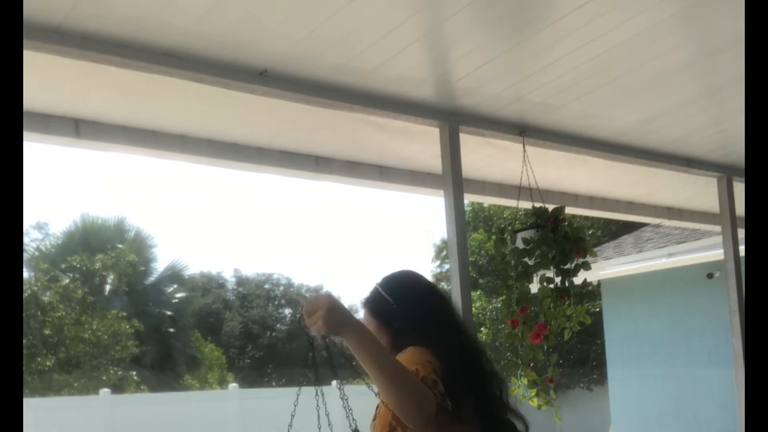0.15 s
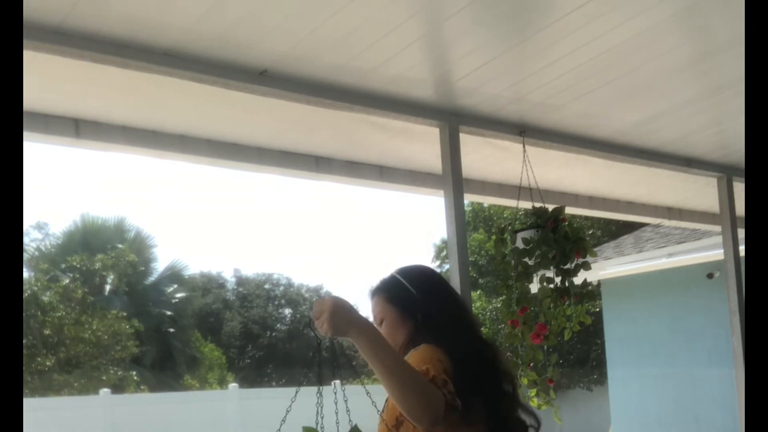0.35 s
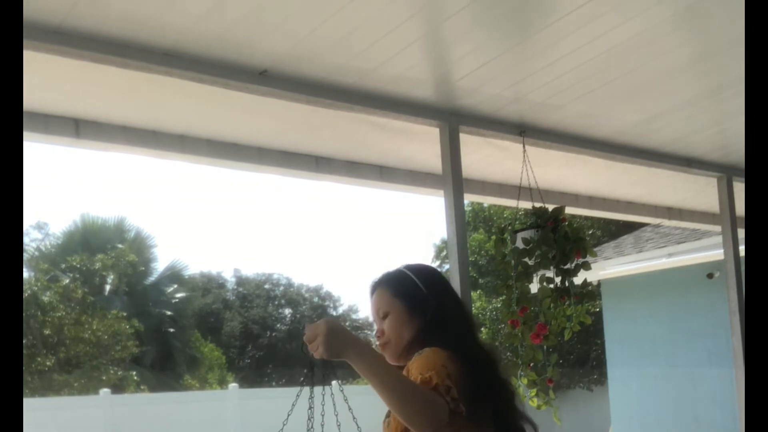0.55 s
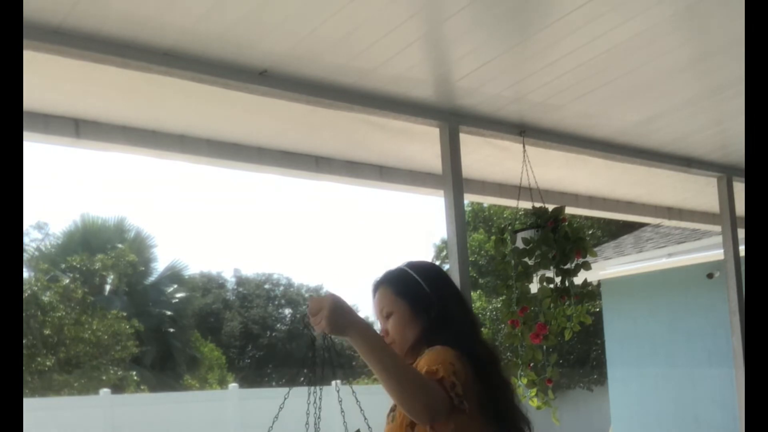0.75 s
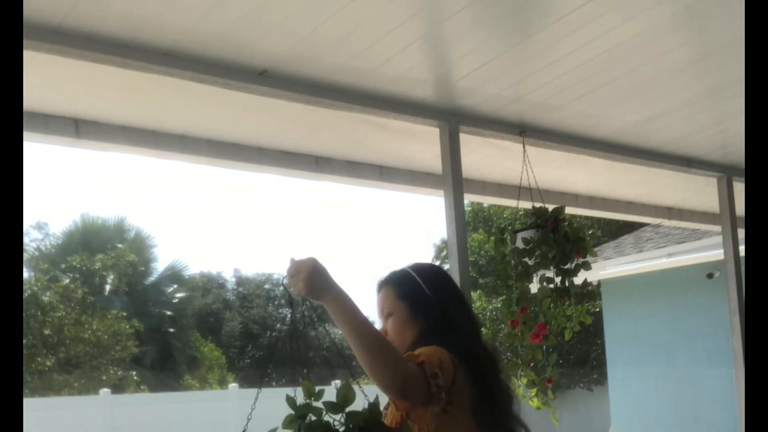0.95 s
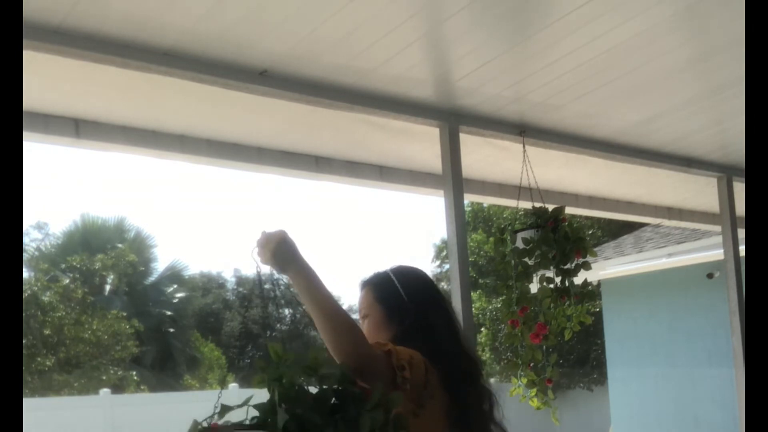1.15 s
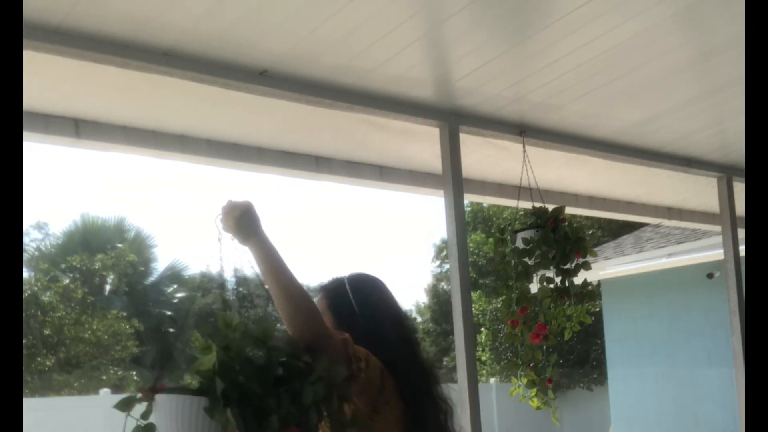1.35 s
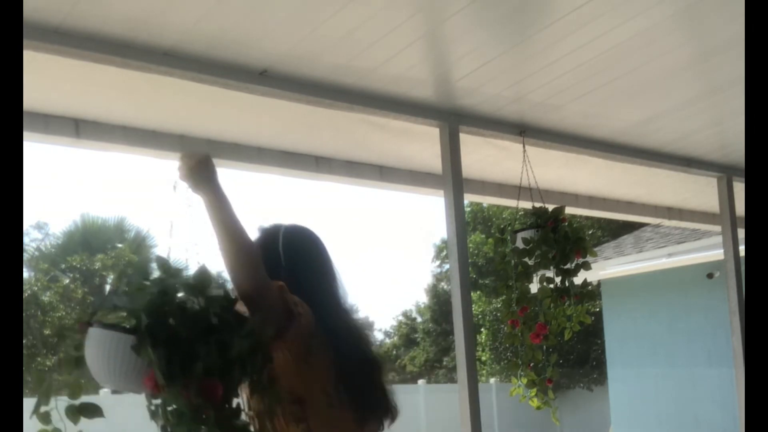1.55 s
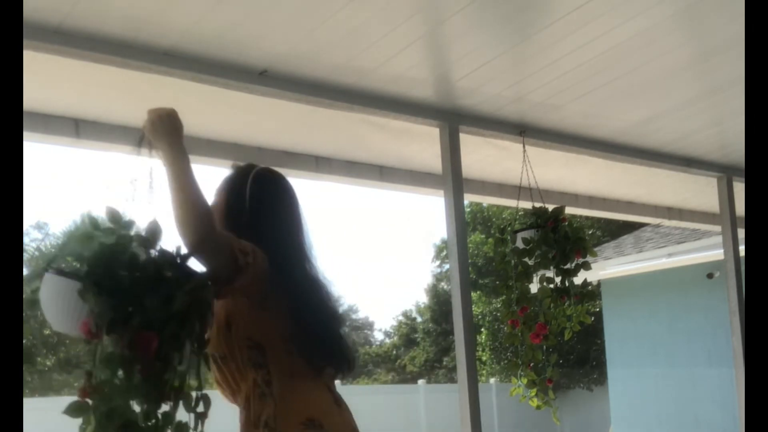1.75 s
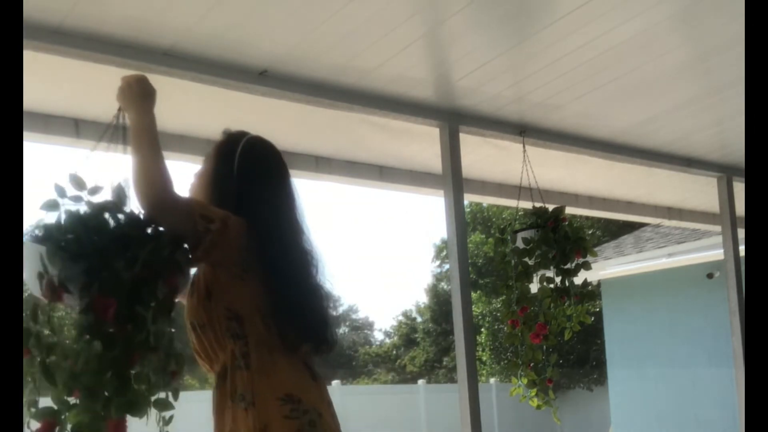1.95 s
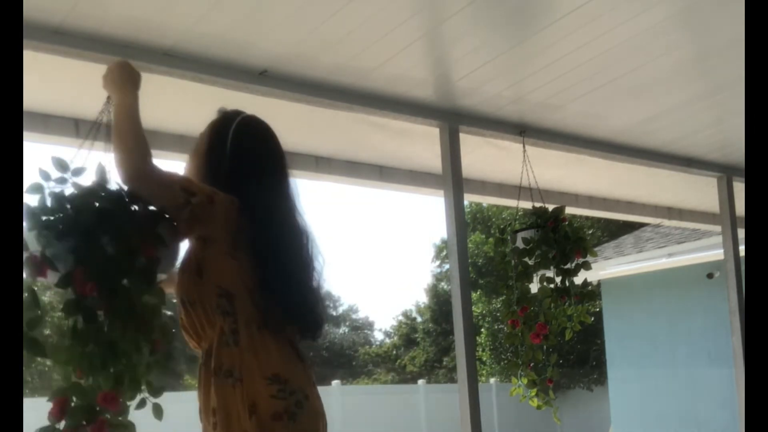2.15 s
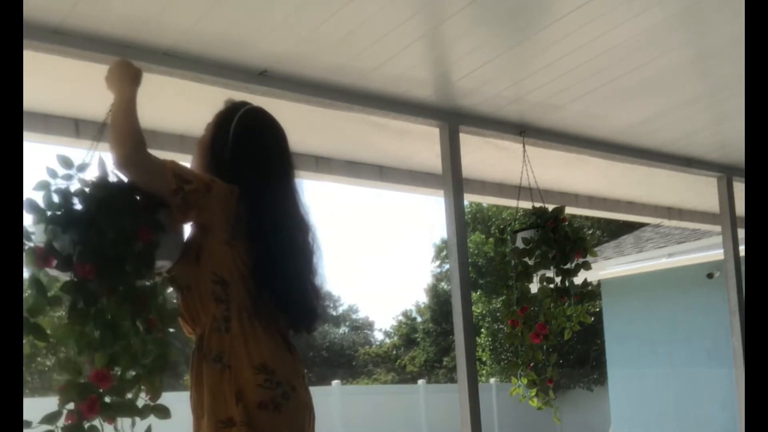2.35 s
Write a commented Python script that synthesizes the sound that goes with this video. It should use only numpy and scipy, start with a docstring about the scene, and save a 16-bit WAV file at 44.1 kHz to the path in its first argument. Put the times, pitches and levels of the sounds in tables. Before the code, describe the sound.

Hollow thumps, probably someone stepping up on a stool with a hanging plant, burst into an overloaded clatter midway and echo beneath the roof, over low outdoor rumble, faint early whine, soft rustling and distant shrill insects.

```python
"""A low garden rumble, a faint far whine and light rustling and brushing open it; hollow knocks follow under a porch roof.
A potted plant is lifted by its wire hanger towards a ceiling hook; the knocks, most likely from stepping up
on a stool, are ringing modes plus noise rattles, spread by a reverberant tail and overloading the microphone.
Wire and leaves brush as flurries of filtered ticks; moving about is a dull noise rustle.
The garden is coloured noise, a wavering tone with its octave, and insects in narrow noise bands."""
import sys
import numpy as np
from scipy import signal
from scipy.fft import rfft, irfft
from scipy.io import wavfile

SR = 44100
rng = np.random.default_rng(int(sys.argv[2]) if len(sys.argv) > 2 else 0)


def store_pcm(level_fs):
    """Save levels as 16-bit WAV."""
    pcm = np.round(np.clip(level_fs, -1, 1) * 32767).astype(np.int16)
    wavfile.write(sys.argv[1], SR, np.atleast_2d(pcm).T)


N = 110250
T = np.arange(N) / SR   # seconds


def from_db(db):
    """Decibels to gain."""
    return 10 ** (np.asarray(db) / 20)


def rms_one(x):
    """Scale to rms 1."""
    return x / np.sqrt(np.mean(x ** 2) + 1e-20)


def at_hz(points, hz):
    """Read a table on a log-frequency axis."""
    f, value = np.transpose(points)
    return np.interp(np.log(np.maximum(hz, 1)), np.log(f), value)


def colour(x, spectrum):
    """Filter a sound to a spectrum table, then scale to rms 1."""
    bins = rfft(x)
    hz = np.arange(len(bins)) * SR / len(x)
    return rms_one(irfft(bins * from_db(at_hz(spectrum, hz)), len(x)))


def noise(spectrum, size=N):
    """Steady noise of a given colour, rms 1."""
    return colour(rng.standard_normal(size), spectrum)


def decay(t, t60_s):
    """Exponential decay that falls 60 dB in t60_s."""
    return np.exp(-np.log(1000) * t / t60_s)


def filtered(x, order, hz, kind):
    """Butterworth filter; kind is low, high or band."""
    # a tiny offset keeps the filter clear of vanishingly small numbers
    return signal.sosfilt(signal.butter(order, hz, kind, fs=SR, output="sos"), x + 1e-18)


def soften(x, hz):
    """Two-pole low-pass."""
    return filtered(x, 2, min(hz, 0.45 * SR), "low")


def add(out, start_s, x):
    """Mix a sound in at a time."""
    start = int(start_s * SR)
    out[start:start + len(x)] += x[:N - start]


def knocks():
    """Each contact rings the hollow body and sets off a short rattle; soft contacts are duller."""
    # contacts: start_s, ring_db and clatter_db (relative), hardness_hz (low-pass cut-off)
    contacts = [(1.102, -36, -8.5, 598), (1.119, -15.5, -14.5, 860), (1.127, -25.5, -7.5, 650),
                (1.454, -10, -3, 325), (1.493, -13.5, -13, 750), (1.5134, -42, 5, 4860),
                (1.5215, -1.5, 10.5, 2380), (1.533, 0.5, -0.5, 1500), (1.546, -4.5, 2.5, 5600),
                (1.5522, -1.5, 9, 3240), (1.581, -10.5, -3.5, 3100), (1.908, -24.5, -14.5, 252),
                (2.178, -15.5, -6.5, 900), (2.1975, -43, -7, 8900), (2.2013, -6.5, 5, 1190),
                (2.206, -18.5, 5, 750)]
    # modes of the hollow body: pitch_hz, level_db (relative), t60_s
    body = [(178.3, -3.5, 0.18), (218, -11.5, 0.067), (259.5, -14, 0.14), (315.4, -15, 0.23),
            (352.7, -18, 0.5), (539.6, -12, 0.18), (629.7, -10, 0.064), (716.7, -18, 0.15),
            (760.4, -20.5, 0.13), (875, -39, 0.058), (977.6, -28, 0.34), (1542, -26, 0.077),
            (2366, -23.5, 0.19), (2880, -39, .1)]
    # colour of the dense rattle: frequency_hz, density_db (relative, per Hz)
    clatter_colour = [(30, -19), (110, -6), (180, 4), (320, 8), (450, -3.5), (650, 3.5), (1100, -11),
                      (1600, -12.5), (2100, -17.5), (2600, -14), (4500, -21), (8000, -35), (16000, -48)]
    mode_spread_db = 1.0   # random change of each mode from contact to contact
    clatter_gain_db, clatter_t60_s, clatter_attack_s = 13.5, 0.1, 0.00033
    bass_cut_hz = 114   # the knocks carry no deep bass

    out, t = np.zeros(N), T[:SR // 2]
    pitch_hz, mode_db, t60_s = np.transpose(body)[:, :, None]
    signs = (-1) ** np.arange(len(body))[:, None]
    modes = signs * np.sin(2 * np.pi * pitch_hz * t) * from_db(mode_db) * decay(t, t60_s)

    burst = (1 - np.exp(-t / clatter_attack_s)) * decay(t, clatter_t60_s)
    burst = burst / np.sqrt(np.sum(burst ** 2))   # unit energy

    for start_s, ring_db, clatter_db, hardness_hz in contacts:
        mode_gains = from_db(ring_db + mode_spread_db * rng.standard_normal(len(body)))
        ring = mode_gains @ modes
        rattle = from_db(clatter_gain_db + clatter_db) * burst * noise(clatter_colour, size=len(t))
        add(out, start_s, soften(ring + rattle, hardness_hz))
    return filtered(out, 2, bass_cut_hz, "high")


def porch(x):
    """Diffuse reflections between roof and floor build up, then die band by band."""
    # decay of the reverberation: frequency_hz, t60_s
    porch_t60 = [(100, 1.38), (300, 0.4269), (800, 0.46), (2500, 0.71), (6000, .5), (14000, 1.74)]
    # its colour: frequency_hz, level_db (relative)
    porch_colour = [(100, -4), (200, -10), (350, 2.5), (800, -1.5), (2500, -2.5), (5000, -1), (10000, -1)]
    level_db, build_s = -3, 0.007

    t, tail = T[:SR], 0
    edges_hz = np.geomspace(50, 17000, 16)
    white = rng.standard_normal((2, SR))   # neighbouring bands use different noise
    for k, (low_hz, high_hz) in enumerate(zip(edges_hz, edges_hz[1:])):
        band = filtered(white[k % 2], 2, [low_hz, high_hz], "band")
        centre_hz = np.sqrt(low_hz * high_hz)
        band_gain = from_db(at_hz(porch_colour, centre_hz))
        tail = tail + band * band_gain * decay(t, at_hz(porch_t60, centre_hz))
    tail = tail * (1 - np.exp(-t / build_s))
    tail = tail / np.sqrt(np.sum(tail ** 2))   # unit energy
    return from_db(level_db) * signal.fftconvolve(x, tail)[:N]


def movement_rustle():
    """Moving about with the plant: dull noise whose level rises and falls."""
    # colour: frequency_hz, density_db (relative, per Hz)
    rustle_colour = [(30, -11), (65, 5), (130, 2), (300, 0), (600, -8.5), (1200, -25.5), (3000, -38),
                     (9000, -44), (16000, -58)]
    # loudness curve: time_s, level_db
    rustle_level = [(0, -47.5), (.49, -53.5), (.53, -38.5), (.9, -41.5), (1.22, -34), (1.36, -38),
                    (1.95, -37.5), (2.1, -43), (2.5, -42.5)]
    time_s, level_db = np.transpose(rustle_level)
    return from_db(np.interp(T, time_s, level_db)) * noise(rustle_colour)


def brushes():
    """The wire hanger and leaves brush in short flurries of tiny ticks of uneven size."""
    # flurries: centre_s, spread_s (standard deviation of the swell), level_db (at the centre)
    flurries = [(0.245, 0.053, -60), (1.437, 0.035, -55.5), (1.501, 0.0082, -41), (1.583, 0.03, -31)]
    # colour of the ticks: frequency_hz, density_db (relative, per Hz)
    tick_colour = [(300, -18), (1000, 15), (3000, 6.5), (6000, -6.5), (10000, -18), (16000, -27)]
    ticks_per_s, size_spread_db = 6900, 3.5

    centre_s, spread_s, level_db = np.transpose(flurries)[:, :, None]
    swells = np.exp(-0.5 * ((T - centre_s) / spread_s) ** 2)
    level = np.sum(from_db(level_db) * swells, axis=0)

    size_db = size_spread_db * np.minimum(rng.exponential(1, N), 4)   # capped so no tick leaps out
    sizes = from_db(size_db) * rng.choice([-1, 1], N)
    ticks = sizes * (rng.random(N) < ticks_per_s / SR)
    return level * colour(ticks, tick_colour)


def garden_rumble():
    """Steady noise, heaviest in the bass."""
    # colour: frequency_hz, density_db (relative, per Hz)
    garden_colour = [(15, -34), (25, -12), (64, 3), (141, -6.5), (270, -1), (439, -17.5), (840, -19),
                     (1020, -22.5), (1260, -25.5), (2000, -27), (16000, -42.5)]
    return from_db(-44) * noise(garden_colour)


def far_whine():
    """A faint wavering tone and its octave rise a little, then sag, swelling and dipping before they stop."""
    # glide: time_s, pitch_hz, fundamental_db, octave_db
    whine = [(0, 982, -61, -80), (.08, 986, -77, -64), (0.201, 1007, -59.5, -69), (.33, 1020, -67, -66.5),
             (0.409, 1005, -87, -76), (0.471, 987, -55, -60), (.56, 930, -55, -71), (.66, 903, -57.5, -76),
             (.8, 883, -75, -90)]
    pitch_jitter = 0.00704   # rms, as a fraction of the pitch
    flutter_db = 5   # rms of the random level flutter

    time_s, pitch_hz, fundamental_db, octave_db = np.transpose(whine)
    jitter = pitch_jitter * rms_one(soften(rng.standard_normal(N), hz=60))
    pitch = np.interp(T, time_s, pitch_hz) * (1 + jitter)
    phase = 2 * np.pi * np.cumsum(pitch) / SR

    wander = rms_one(soften(rng.standard_normal(N), hz=28))
    flutter = rms_one(from_db(flutter_db * wander))
    tones = 0
    for harmonic, level_db in ((1, fundamental_db), (2, octave_db)):
        level = np.interp(T, time_s, from_db(level_db), right=0)   # silent after the last row
        tones = tones + level * np.sin(harmonic * phase)
    return np.sqrt(2) * flutter * tones   # the root of 2 makes the table levels rms


def insects():
    """A distant chorus swells in narrow shrill noise bands, one after another."""
    # bands: centre_hz, width_hz, level_db (once swelled), swell_s (middle of the rise)
    chorus = [(4410, 700, -66, 1.2), (4834, 130, -63, 2), (8900, 600, -68, 1.95), (9600, 660, -70.5, 2.25)]
    rise_s = 0.06
    before = from_db(-16)   # gain ahead of the swell

    out = 0
    for centre_hz, width_hz, level_db, swell_s in chorus:
        edges_hz = [centre_hz - width_hz / 2, centre_hz + width_hz / 2]
        band = rms_one(filtered(rng.standard_normal(N), 2, edges_hz, "band"))
        rise = 0.5 * (1 + np.tanh((T - swell_s) / rise_s))
        out = out + from_db(level_db) * (before + (1 - before) * rise) * band
    return out


def scene():
    """Knocks under the roof, the rustle of moving about, brushing, and the garden."""
    hits = knocks()
    handling = movement_rustle() + brushes()
    garden = garden_rumble() + far_whine() + insects()
    return (hits + porch(hits) + handling + garden)[None]


def record(dry):
    """The microphone overloads: the loudest peaks flatten at full scale; then the top is cut."""
    knee = 40   # higher bends more sharply
    cutoff_hz = 16600
    clipped = dry / (1 + np.abs(dry) ** knee) ** (1 / knee)
    # steep low-pass, 70 dB down from the cut-off up
    return signal.sosfilt(signal.cheby2(12, 70, cutoff_hz, fs=SR, output="sos"), clipped)


dry = scene()
out = record(dry)
store_pcm(out)
```